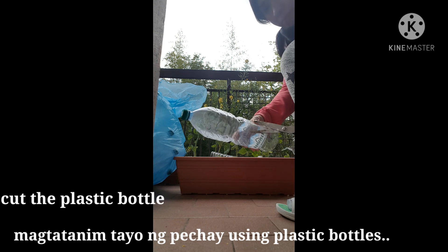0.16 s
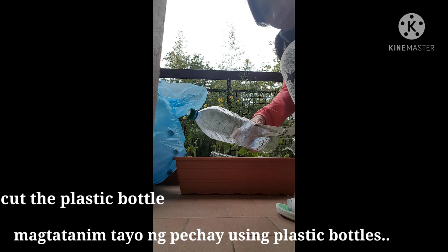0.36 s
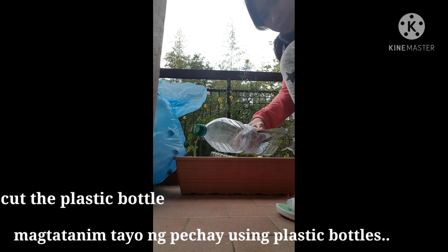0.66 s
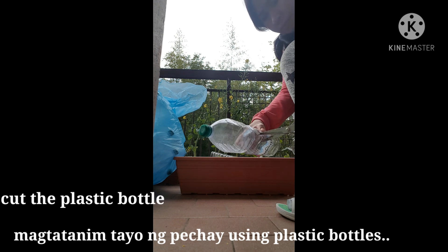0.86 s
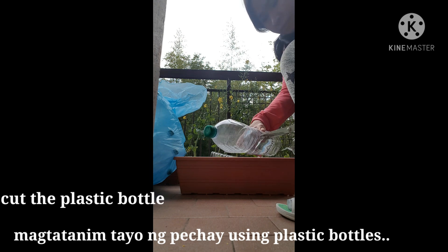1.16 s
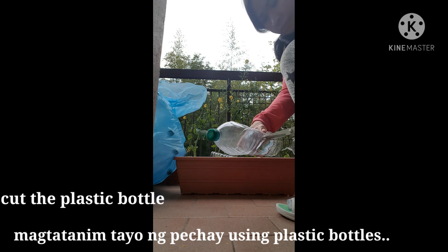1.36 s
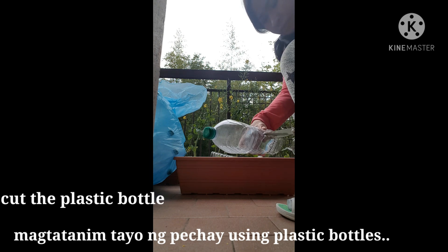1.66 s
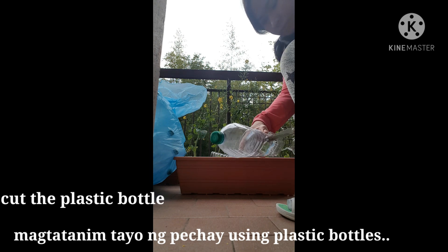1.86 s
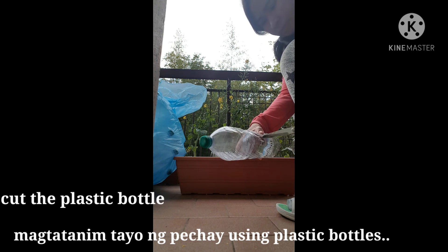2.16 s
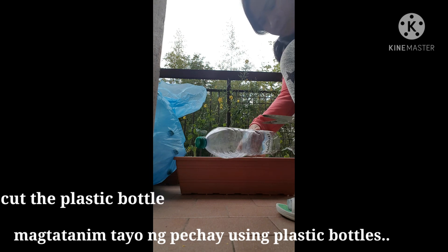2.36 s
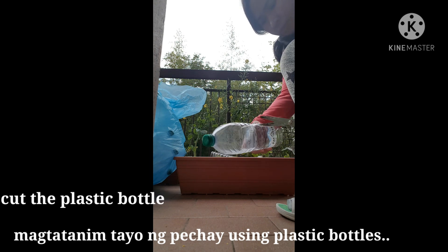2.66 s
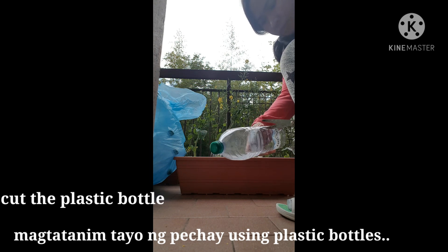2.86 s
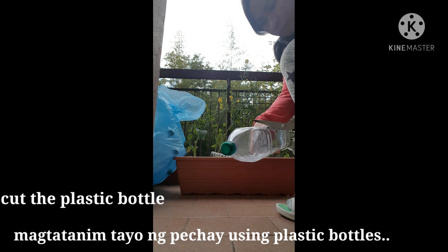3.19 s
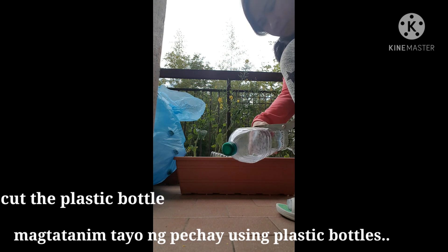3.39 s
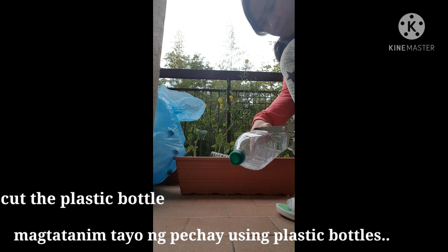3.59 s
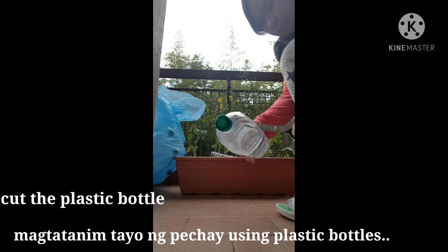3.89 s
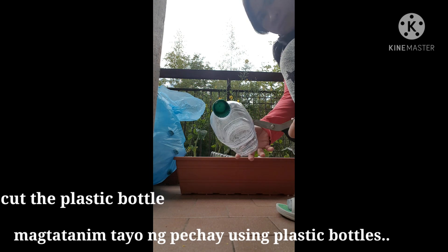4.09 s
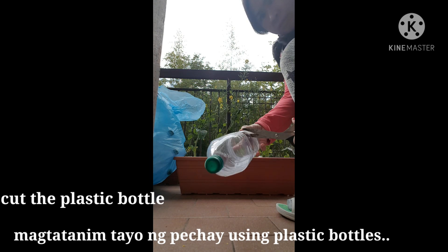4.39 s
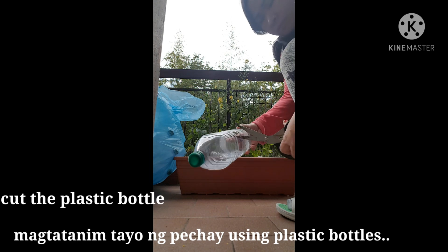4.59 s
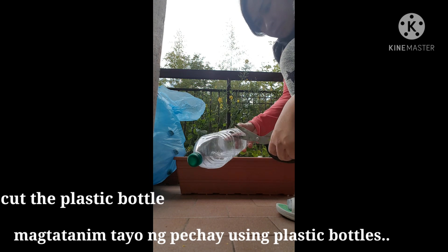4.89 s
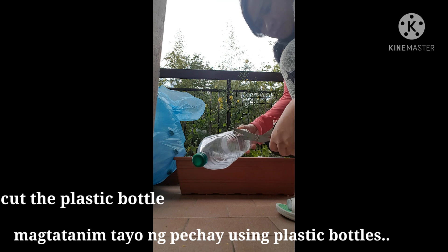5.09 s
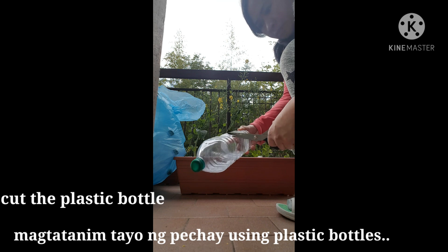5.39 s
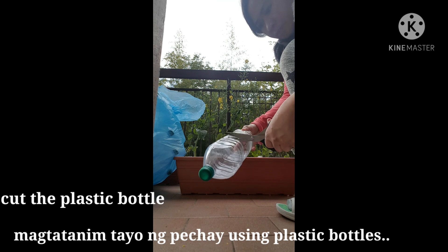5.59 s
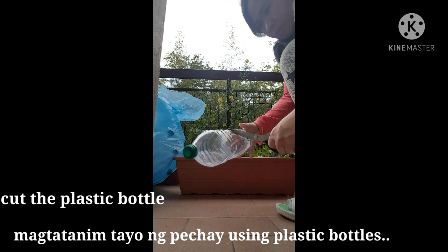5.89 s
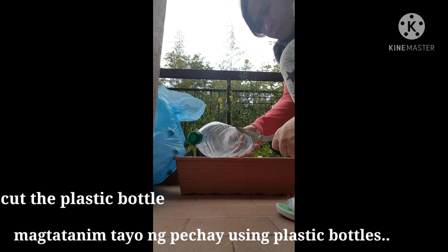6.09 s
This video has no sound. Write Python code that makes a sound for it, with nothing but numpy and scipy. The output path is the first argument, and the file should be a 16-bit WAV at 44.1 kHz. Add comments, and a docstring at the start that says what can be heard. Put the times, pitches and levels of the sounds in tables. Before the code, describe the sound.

A thin plastic bottle crackles and caves in with bright snaps and low puffs of air, pauses briefly, then is cut with short, dry, raspy scissor strokes. Later strokes are fuller and hollow, mixed with loud isolated cracks and a final cluster of crunches. The sound is close, slightly to the right, with short balcony reflections and very quiet outdoor air.

```python
"""Cutting a thin-walled shell

Scissors cut a thin plastic bottle in two on a balcony. Cracks and buckles are impulses that excite
a panel, the stiff wall and the air; the blades' short strokes are stick-slip noise through the same
kind of resonances, hollower as the shell opens. Hissing steel and decaying swings of pressure join them.
The balcony walls reverberate; outside are a town hum, leaf hiss (both filtered noise) and a bird
whose two thin falling whistles are gliding sines."""
import sys
import numpy as np
from scipy import signal
from scipy.fft import rfft, irfft, next_fast_len
from scipy.io import wavfile
from scipy.ndimage import map_coordinates

SR = 44100
rng = np.random.default_rng(int(sys.argv[2]) if len(sys.argv) > 2 else 0)


def put_to_file(sound):
    """Save the sound as 16-bit audio at rate SR, in the file named by the first command-line argument."""
    columns = np.atleast_2d(sound).T  # one column per channel
    safe = np.clip(columns, -1, 1)
    whole_steps = np.round(safe * 32767)
    wavfile.write(sys.argv[1], SR, whole_steps.astype(np.int16))


N = 275625

# outdoor background: (t/s, hum level/dB, leaf hiss level/dB)
OUTDOOR_LEVELS = [(0, -57.5, -68), (0.348, -61, -73.5), (1.8, -70, -71), (2.65, -77.5, -70.5),
                  (4.2, -54, -69), (6.25, -62, -66)]
# relative spectrum of the town hum: (f/Hz, level/dB)
TOWN_SPECTRUM = [(20, -18.5), (50, -4), (114, -0.5), (212, -8), (330, -8), (750, -15), (1100, -23.5),
                 (1900, -33.5), (4000, -42.5), (8000, -68)]
# relative spectrum of the leaf hiss: (f/Hz, level/dB)
LEAF_SPECTRUM = [(500, -6.5), (1200, 1.5), (2600, 3), (4500, -7), (8000, -12), (9500, -13), (13000, -11.5),
                 (15200, -11.5), (16200, -30)]
# bird whistles: (t/s, length/s, first f/Hz, limiting f/Hz, glide time constant/s, level/dB)
WHISTLES = [(2.013, 0.38, 7920, 7290, .16, -64.5), (6.032, 0.28, 8750, 7570, .06, -59.5)]
WHISTLE_ATTACK_S, WHISTLE_RELEASE_S = .05, 0.066

# reverberation of the balcony walls: (f/Hz, t60/s)
BALCONY_DECAY = [(100, 1), (450, 0.55), (2500, 0.3), (4200, 0.38), (7000, 0.21), (14000, .27)]
# ring of the plastic shell: (f/Hz, t60/s)
SHELL_DECAY = [(150, 0.18), (450, 0.085), (2500, 0.067), (7000, 0.065), (14000, 0.015)]
# left-right balance: (f/Hz, left minus right level/dB)
STEREO_LEAN = [(40, -17), (100, -2), (200, -1.5), (500, -2.5), (900, -2), (1400, -6), (2400, -4),
               (4200, -2.5), (8000, -5.5), (14000, -0.5)]
# unlikeness of the two microphones: (f/Hz, gain of the side channel)
SIDE_GAIN = [(50, 0.21), (160, 0.2), (450, 0.19), (1100, 1), (2300, 0.5), (5000, 0.83), (14000, 1)]

# steel blades sliding over each other as they open: (t/s, length/s, level/dB)
SLIDES = [(1.607, .055, -55), (1.922, .03, -50.5), (3.609, 0.041, -50)]
# spectrum of the steel hiss: (f/Hz, level/dB)
STEEL_SPECTRUM = [(3000, -21.5), (6000, -4), (9000, -12.5), (11500, -0.5), (14500, -5), (16200, -18.5)]
# air pushed out as the bottle caves in: (t/s, level/dB, half-period and decay time/s)
PUFFS = [(0.764, -21.5, 0.0053), (.832, -12, 0.0041), (2.077, -17, 0.0024), (5.657, -38, 0.0085)]
# standing waves of the bottle's air and walls, and the gaps between: (f/Hz, width/Hz, level/dB)
BOTTLE_MODES = [(224, 48, 4), (300, 62, -1.5), (383, 33, 4.5), (445.4, 26, 5.5), (517.5, 7, -5),
                (623.2, 23, 5), (755.6, 52, 4), (840, 27, -1), (1180, 660, -1), (1616, 110, 4),
                (2180, 330, 2.5), (2676, 220, 2), (3650, 64, 1.5), (4167, 2950, -3.5)]
# how far the bottle is cut open: (t/s, share 0-1)
OPENING = [(2.9, 0), (3.5, 0.47), (3.95, 0.71), (4.4, 0.86), (5.5, 1)]

# blades and hand dragging along the plastic: (t/s, rise/s, fall/s, panel level/dB, bite of the edge/dB)
STROKES = [(0.511, .045, 0.038, -50.5, -3.5), (1.92, 0.014, 0.052, -51, -4), (1.951, .031, 0.04, -41.5, 2),
           (2.886, 0.016, 0.025, -44, -0.5), (2.971, 0.037, 0.13, -41, -4.5), (3.05, 0.12, .06, -36, -6.5),
           (3.115, .024, .02, -30, -25), (3.179, .031, 0.033, -28.5, -8), (3.25, 0.08, .074, -42, -7.5),
           (3.343, .031, .056, -42, 8), (3.39, 0.043, 0.059, -40, -1), (3.583, .051, 0.04, -38.5, 3),
           (3.761, .035, 0.015, -27, 14), (3.812, .025, .011, -25, -18), (3.994, 0.034, 0.012, -21, -7),
           (4.035, .018, .025, -27.5, 6.5), (4.078, 0.02, 0.024, -33, -28),
           (4.256, 0.022, 0.024, -42.5, -4), (4.331, .037, .093, -38.5, -3.5),
           (4.459, 0.039, 0.087, -46.5, -8), (4.894, .05, .025, -28, -1), (5.068, .057, 0.039, -29, -3),
           (5.135, 0.028, .027, -31.5, -1.5), (5.19, 0.045, .047, -32, -9), (5.27, .048, 0.095, -35, 6),
           (5.433, .093, .04, -36, 9), (5.54, 0.026, 0.021, -25, -1.5), (5.572, .013, .017, -33, 8),
           (5.667, .05, 0.044, -28, -1.5), (5.75, 0.021, 0.041, -29, 11.5), (5.812, .023, .044, -34, 7),
           (6.166, 0.059, 0.12, -40, 2)]
# spectrum of the hollow shell under a stroke: (f/Hz, level/dB)
HOLLOW_SPECTRUM = [(30, -41), (100, -16), (160, -3.5), (205, 6.5), (260, 4), (340, -11), (900, -36.5)]
# spectrum of a stroke's fizz: (f/Hz, level/dB)
FIZZ_SPECTRUM = [(2000, -8), (4300, 3.5), (7500, -3.5), (9200, -9.5), (12000, -4), (15000, -10),
                 (16200, -35)]
# a stroke's wall and fizz relative to its panel, and the share of the bite that the wall takes
RASP_WALL_DB, RASP_FIZZ_DB, WALL_BITE, RASP_WALL_HZ = -3, -13.5, 0.55, 1930
# the open shell is hollower under a stroke, its snaps thud more and its dragged panels sag in pitch
HOLLOW_SHUT_DB, HOLLOW_GAIN_DB, THUD_GAIN_DB = -21, 15, 5.5
RASP_PANEL_HZ, PANEL_SAG_HZ = 630, 129

# breaks of the wall: (t/s, wall level/dB, panel give/dB, crumple time/s, sharpness/dB)
CRACKS = [(0.766, -24, -1, 0.003, -1), (0.7679, -16.5, -4, 0.014, -0.5), (0.8092, -22.5, -5.5, 0.0016, -6),
          (0.8332, -19.5, -5, .002, -4.5), (0.8528, -20, -3, 0.0028, -2.5), (1.0855, -22, -3, 0.0048, -5),
          (1.1002, -28.5, 1.5, 0.005, -6.5), (1.161, -49, -2.5, 0.0017, -3),
          (1.1926, -47.5, -5, .0006, -8.5), (1.2101, -42, -4, 0.0018, -8), (1.2502, -18.5, -9, 0.0038, -12),
          (1.3214, -25, -9.5, 0.002, -8), (1.369, -31, -2.5, 0.0017, -10), (1.4679, -20, -10, 0.0019, -7),
          (1.6702, -49.5, 5.5, 0.0026, 5), (1.7035, -57.5, -6, .002, 0), (1.8973, -50.5, -5.5, 0.0028, 5.5),
          (2.069, -21.5, 8.5, 0.00058, -2.5), (2.0948, -18.5, -14, 0.0034, -3),
          (2.1373, -23.5, -5, 0.0053, -7), (2.2292, -31, -4.5, .002, -2.5), (2.441, -20, -4, 0.00088, -7),
          (2.8177, -24.5, -7, 0.0015, -5.5), (3.1441, -27.5, -3, .003, 3),
          (3.5492, -53.5, -15, 0.00039, 1.5), (3.5819, -39.5, 0, 0.0043, -7), (3.8516, -33, 2.5, .0035, 5),
          (4.6454, -15, -8.5, .0006, -14), (4.7918, -44, -1, 0.0021, -1.5),
          (5.3081, -20.5, -16.5, 0.00061, -10), (5.4363, -30.5, -1, .001, -6.5),
          (5.6646, -18.5, -2.5, 0.0063, -2.5), (5.697, -20.5, -5, 0.0022, -6),
          (5.7339, -21.5, -13, 0.00024, -3.5), (5.7698, -22, -18, .0008, -3.5),
          (5.8209, -40.5, 5, .003, 6.5), (5.873, -36, 1.5, .005, 2)]
# panels that pop without breaking: (t/s, wall level/dB, panel give/dB, crumple time/s, panel f/Hz)
BUCKLES = [(0.4168, -36, -.5, .0013, 640), (0.444, -48, -1, 0.0025, 450), (0.4723, -48.5, 7, 0.0024, 340),
           (0.489, -53, 4.5, 0.0057, 412), (0.6316, -22, 2, 0.0083, 697), (0.682, -23, -2, 0.0067, 450),
           (0.7109, -36.5, 4, 0.0024, 453), (0.7374, -46.5, 8.5, .004, 686),
           (0.7482, -21.5, 6, 0.0045, 470), (0.9101, -40, 5, 0.0028, 725), (0.9502, -38, 2.5, 0.0033, 625),
           (0.9896, -40.5, 4.5, 0.0035, 477), (1.1132, -32, -11, 0.0039, 454),
           (1.6221, -32, -1, 0.0024, 635), (2.071, -30, 11.5, .0012, 750),
           (2.0815, -27, 10.5, 0.00067, 425), (2.219, -44.5, 3, 0.0068, 607), (2.446, -43, 12, 0.0038, 484),
           (2.6906, -47.5, 3, 0.007, 686), (2.7323, -48, 9, 0.0059, 490), (2.7853, -57.5, 6, .0025, 558),
           (2.8357, -26.5, -9.5, 0.0018, 624), (3.0271, -48.5, 7, 0.011, 640),
           (3.2095, -32, -9, 0.0022, 630), (3.2943, -37.5, 0, 0.0061, 450),
           (3.3048, -35.5, 2.5, 0.0069, 570), (3.7225, -47, 6, .003, 630), (3.7453, -40, 2, 0.018, 487),
           (3.8568, -32, 1.5, .0035, 684), (3.9477, -41.5, 11, 0.013, 634), (4.0091, -34, 4.5, .006, 587),
           (4.307, -37, -10, 0.0014, 470), (4.319, -19.5, -3, 0.0089, 524), (4.9031, -29, -2, 0.0045, 563),
           (5.259, -35.5, 2, 0.0046, 470), (5.3945, -37.5, -3, 0.0076, 526), (5.5448, -24.5, 1, .012, 332),
           (5.8041, -18, -17, .001, 454), (6.0444, -46.5, -5, 0.0063, 571), (6.1748, -44, 6, 0.0044, 547)]
# spectrum of a snap's tick: (f/Hz, level/dB)
TICK_SPECTRUM = [(1500, -49), (4300, 2.5), (7400, 2), (9200, -8), (13000, -3), (15000, -10.5),
                 (16200, -22.5)]
# spectrum of the air pushed by a snap: (f/Hz, level/dB)
THUD_SPECTRUM = [(20, -23.5), (60, -13.5), (110, -7), (170, 2.5), (235, -6.5), (380, 2), (1200, -74)]
# a typical snap: crumple time, Q of the wall, thud against the panel, ring of the shell
TYPICAL_CRUMPLE_S, SNAP_WALL_Q, SNAP_THUD_DB, SHELL_RING_DB = 0.0016, 1.55, -19, -2
# each doubling of the crumple time is a larger patch: lower (octaves) and more thud (dB);
# above the typical time it is also broader (octaves of Q)
SIZE_FLATTENS, SIZE_BROADENS, SIZE_THUD_DB = 0.11, 0.41, 3
# more give lowers the wall, and positive give narrows the panel resonance (octaves per dB)
GIVE_FLATTENS, GIVE_NARROWS = 0.013, .05
# a blunt break loses its top: dB per octave for each dB of sharpness, above this corner
TICK_TILT, TICK_CORNER_HZ = 0.46, 6050
# a buckle's tick stays faint: level, at most this far relative to the wall
BUCKLE_TICK_DB, BUCKLE_SHARP_DB = -55.5, -8
# the wall is taut where it cracks and slack where it buckles
CRACK_PANEL_HZ, CRACK_WALL_HZ, BUCKLE_WALL_HZ = 575, 2210, 2033
TOP_HZ = 16600  # upper band limit


def amp(db):
    """Level to amplitude: 20 dB is a factor of ten."""
    return 10 ** (np.asarray(db) / 20)


def unit(x):
    """Power normalisation: the mid channel gets rms 1."""
    return x / np.sqrt(np.mean(x[0] ** 2) + 1e-20)


def along(points, hz):
    """Interpolation of (f/Hz, value) points on a logarithmic frequency axis."""
    f, v = np.transpose(points)
    return np.interp(np.log(hz + 1), np.log(f), v)


def filtered(x, gain):
    """Minimum-phase filtering: folding the cepstrum makes the given gain causal."""
    n = x.shape[-1]
    m = 2 * next_fast_len(n // 2 + 2048)
    magnitude = np.maximum(gain(np.fft.rfftfreq(m, 1 / SR)), 1e-6)
    cepstrum = irfft(np.log(magnitude))
    cepstrum[1:m // 2] *= 2
    cepstrum[m // 2 + 1:] = 0
    response = np.exp(rfft(cepstrum))
    return irfft(rfft(x, m) * response, m)[..., :n]


def colour(points):
    """Spectral shaping: a gain of frequency from (f/Hz, level/dB) points."""
    return lambda f: amp(along(points, f))


def resonance(hz, q):
    """Resonance: gain falls with detuning, here squared for steep skirts."""
    detune = lambda f: (q * (f / hz - hz / (f + 1))) ** 2
    return lambda f: 1 / (1 + detune(f) / 2) ** 2


def wobble(t, rate):
    """Random modulation: interpolated noise with the given number of values per second."""
    return map_coordinates(rng.standard_normal(SR // 100), [t * rate], mode="wrap")


def add(track, s, x):
    """Superposition: x joins the track from time s."""
    i = max(round(s * SR), 0)
    part = track[:, i:i + x.shape[1]]
    part += x[:, :part.shape[1]]


def tail(decay, length):
    """Diffuse decay: mid/side noise loses 60 dB in each frequency's t60; mid energy is 1."""
    hz, t, z = signal.stft(rng.standard_normal((2, length)), SR, nperseg=256)
    fade = amp(-60 * t / along(decay, hz)[:, None])
    ring = signal.istft(z * fade, SR, nperseg=256)[1][:, :length]
    return ring / np.linalg.norm(ring[0])


def on_balcony(x, wet_db):
    """Reverberation: a diffuse answer of the walls follows the direct mid/side sound by 5 ms."""
    out = amp(wet_db) * signal.fftconvolve(x, tail(BALCONY_DECAY, SR * 2 // 3), axes=1)
    out = np.pad(out, ((0, 0), (SR // 200, 0)))
    out[:, :x.shape[1]] += x
    return out


def slips(length, rate, spread_db):
    """Stick-slip friction: a mid/side train of tiny random impulses of uneven size."""
    fired = rng.random(length) < rate / SR
    size = amp(spread_db * np.clip(rng.standard_normal(length), -2, 2))
    return unit(fired * size * rng.standard_normal((2, length)))


def outdoors():
    """Broadband noise: town hum and leaf hiss are shaped noises with slowly varying levels."""
    s, hum_db, hiss_db = np.transpose(OUTDOOR_LEVELS)

    def level(db):
        """Gain in time: levels are interpolated in dB."""
        return amp(np.interp(np.arange(N) / SR, s, db))

    def air(points):
        """Spectral shaping of noise whose side is wider than its mid."""
        noise = rng.standard_normal((2, N)) * [[1], [1.5]]
        return unit(filtered(noise, colour(points)))

    return level(hum_db) * air(TOWN_SPECTRUM) + level(hiss_db) * air(LEAF_SPECTRUM)


def bird(waver=0.0022, wet_db=-10):
    """Frequency glide: nearly pure tones fall exponentially and level off."""
    out = np.zeros((2, N))
    for s, length, first_hz, last_hz, glide_s, db in WHISTLES:
        t = np.arange(round(length * SR)) / SR
        glide = last_hz + (first_hz - last_hz) * np.exp(-t / glide_s)
        pitch = glide * (1 + waver * wobble(t, 250))
        swell = np.minimum(t / WHISTLE_ATTACK_S, 1) * np.minimum((length - t) / WHISTLE_RELEASE_S, 1)
        phase = 2 * np.pi * np.cumsum(pitch) / SR
        tone = np.sqrt(2) * amp(db) * swell * np.sin(phase)
        add(out, s, on_balcony(np.array([tone, tone / 2]), wet_db))
    return out


def slides(wet_db=-15):
    """Sliding friction: steel on steel gives a short, thin hiss of dense slips."""
    out = np.zeros((2, N))
    for s, length, db in SLIDES:
        n = round(length * SR)
        hiss = unit(filtered(slips(n, rate=9000, spread_db=4.0), colour(STEEL_SPECTRUM)))
        swell = np.sin(np.pi * np.arange(n) / n)
        add(out, s, on_balcony(amp(db) * hiss * swell, wet_db))
    return out


def puffs(left_db=-14):
    """Displaced air: a collapse gives a fast-decaying swing of pressure, mostly at the right."""
    out, t = np.zeros((2, N)), np.arange(SR // 10) / SR
    for s, db, length in PUFFS:
        swing = np.sin(np.pi * t / length) * np.exp(-t / length)
        add(out, s, amp(db) * swing * np.array([[amp(left_db)], [1]]))
    return out


def bottle(f):
    """Standing waves: Lorentzian peaks and dips, summed in dB, colour the hollow bottle."""
    return amp(-1.5 + sum(db / (1 + (2 * (f - hz) / width) ** 2) for hz, width, db in BOTTLE_MODES))


def opening(s):
    """Boundary change: the share of the bottle that is cut open at time s."""
    return np.interp(s, *np.transpose(OPENING))


def strokes(crackle_db=-7.5, rough_db=1.0, surge_db=2.5, ring_db=-5, wet_db=-15, swell=0.99,
            panel_q=0.97, wall_q=0.74):
    """Stick-slip excitation: uneven rasps swell and stop; bite brightens, opening hollows them."""
    out = np.zeros((2, N))
    for s, rise, fall, panel_db, bite_db in STROKES:
        hollow_db = panel_db + HOLLOW_SHUT_DB + HOLLOW_GAIN_DB * opening(s)
        wall_db = panel_db + RASP_WALL_DB + WALL_BITE * bite_db
        fizz_db = panel_db + RASP_FIZZ_DB + bite_db
        panel_hz = RASP_PANEL_HZ - PANEL_SAG_HZ * opening(s)
        t = np.arange(round((rise + fall) * SR) + SR // 10) / SR
        ramp = np.interp(t, [0, rise, rise + fall], [0, 1, 0])
        force = np.abs(np.sin(np.pi / 2 * ramp)) ** swell
        judder = amp(rough_db * wobble(t, 300))
        surge = amp(surge_db * wobble(t, 70))
        rasp = force * unit(surge * judder * slips(len(t), rate=7000, spread_db=4.5))
        # now and then the edge catches and lets go with a tiny crack
        caught = rng.random(len(t)) < 110 / SR
        catches = caught * rng.uniform(-1.14, 1, len(t)) * np.sqrt(SR / 40)
        catch_side = np.roll(catches, -2) - np.roll(catches, 2)
        rasp = rasp + amp(crackle_db) * np.sqrt(force) * np.array([catches, catch_side])
        ring = signal.fftconvolve(rasp, tail(SHELL_DECAY, SR // 6), axes=1)[:, :len(t)]
        rasp = rasp + amp(ring_db) * ring
        parts = [(colour(HOLLOW_SPECTRUM), hollow_db), (resonance(panel_hz, panel_q), panel_db),
                 (resonance(RASP_WALL_HZ, wall_q), wall_db), (colour(FIZZ_SPECTRUM), fizz_db)]
        stroke = sum(amp(db) * unit(filtered(rasp, gain)) for gain, db in parts)
        force_rms = np.sqrt(np.mean(force ** 2))
        add(out, s, on_balcony(stroke * force_rms, wet_db))
    return out


def tick(sharp_db):
    """Impulse bandwidth: the sharper the break, the brighter the tick."""
    def gain(f):
        octaves = np.log2(np.maximum(f / TICK_CORNER_HZ, 1))
        return amp(along(TICK_SPECTRUM, f) + TICK_TILT * sharp_db * octaves)
    return gain


def snaps(panel_q=1.034, crumple_db=3, wet_db=-18):
    """Impulse response: a kick and short crumple excite air, panel and wall, then ring the shell."""
    out, t = np.zeros((2, N)), np.arange(SR // 7) / SR
    blow = round(.012 * SR)  # part levels are rms over these first samples
    events = [(*row, CRACK_PANEL_HZ, CRACK_WALL_HZ, sharp_db) for *row, sharp_db in CRACKS]
    for s, db, *rest in BUCKLES:
        events.append((s, db, *rest, BUCKLE_WALL_HZ, min(BUCKLE_TICK_DB - db, BUCKLE_SHARP_DB)))
    for s, wall_db, give_db, crumple, panel_hz, rest_hz, sharp_db in events:
        crumple_s = max(crumple, 1 / SR)
        size = np.log2(crumple_s / TYPICAL_CRUMPLE_S)
        wall_hz = rest_hz / 2 ** (SIZE_FLATTENS * size + GIVE_FLATTENS * give_db)
        wall_q = SNAP_WALL_Q / 2 ** (SIZE_BROADENS * max(size, 0))
        purity = panel_q * 2 ** (GIVE_NARROWS * max(give_db, 0))
        panel_db, tick_db = wall_db + give_db, wall_db + sharp_db
        thud_db = panel_db + SNAP_THUD_DB + SIZE_THUD_DB * size + THUD_GAIN_DB * opening(s)
        burst = slips(len(t), rate=19000, spread_db=1.5)[0] * np.exp(-t / crumple_s)
        push = amp(crumple_db) * burst / (np.linalg.norm(burst) + 1e-9)
        push[SR // 4000] += 1  # the kick itself
        # the snap reaches the two microphones a few samples apart
        push, lag = np.roll(push, 6), rng.integers(2, 7)
        push_side = (np.roll(push, -lag) - np.roll(push, lag)) / np.sqrt(2)
        push = np.array([push, push_side])
        ring = amp(SHELL_RING_DB) * tail(SHELL_DECAY, len(t))
        # each part: (gain of frequency, level/dB, feed into the ring/dB)
        parts = [(colour(THUD_SPECTRUM), thud_db, -4), (resonance(panel_hz, purity), panel_db, 2.5),
                 (resonance(wall_hz, wall_q), wall_db, -.5), (tick(sharp_db), tick_db, .5)]
        snap = 0
        for gain, db, feed_db in parts:
            x = filtered(push + amp(feed_db) * ring, gain)
            snap = snap + amp(db) * x / np.sqrt(np.mean(x[0, :blow] ** 2))
        add(out, s, on_balcony(snap, wet_db))
    return out


def scene():
    """Superposition and stereo: side gain and left-right balance both vary with frequency."""
    mid, side = filtered(snaps() + strokes(), bottle) + slides() + bird() + outdoors()
    side = filtered(side, lambda f: np.abs(along(SIDE_GAIN, f)))
    left_gain = lambda f: 2 / (1 + amp(-along(STEREO_LEAN, f)))
    left = filtered(mid + side, left_gain)
    right = filtered(mid - side, lambda f: 2 - left_gain(f))
    return np.array([left, right]) + puffs()


def record(dry):
    """Saturation and band limiting: tall peaks are rounded, then nothing from TOP_HZ up is kept."""
    held = dry / (1 + np.abs(dry) ** 6) ** (1 / 6)
    m = next_fast_len(N + SR // 2)
    passband = np.fft.rfftfreq(m, 1 / SR) < TOP_HZ
    return irfft(rfft(held, m) * passband, m)[:, :N]


dry = scene()
out = record(dry)
put_to_file(out)
```